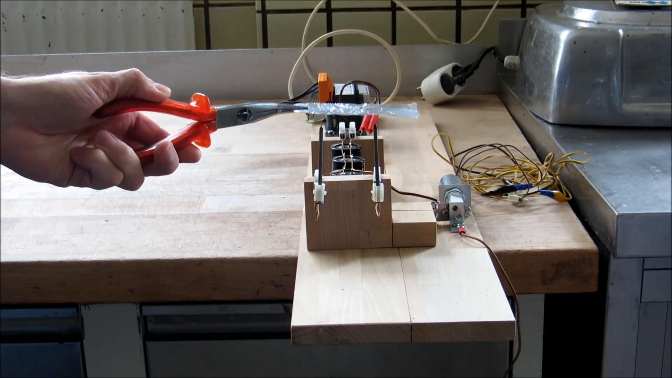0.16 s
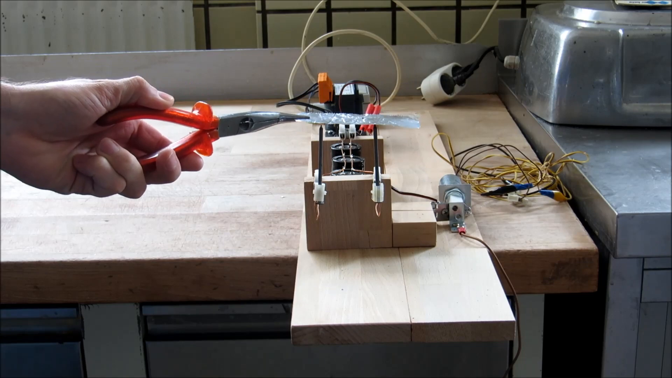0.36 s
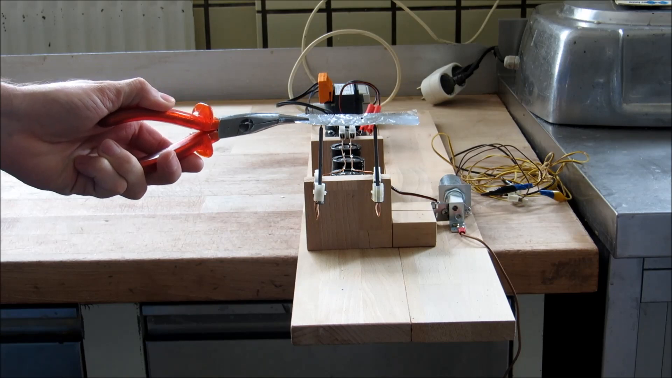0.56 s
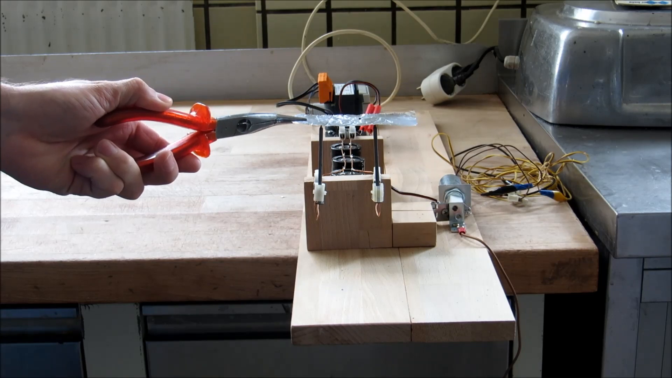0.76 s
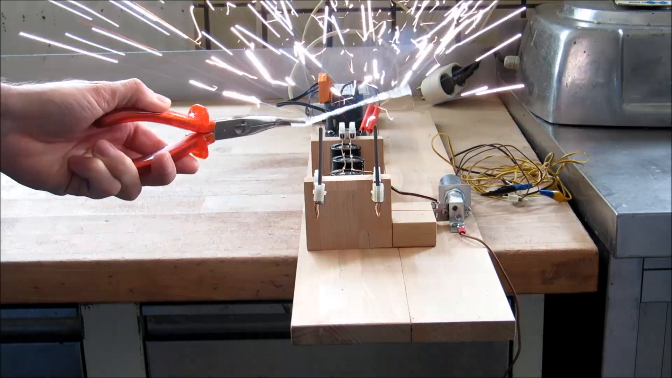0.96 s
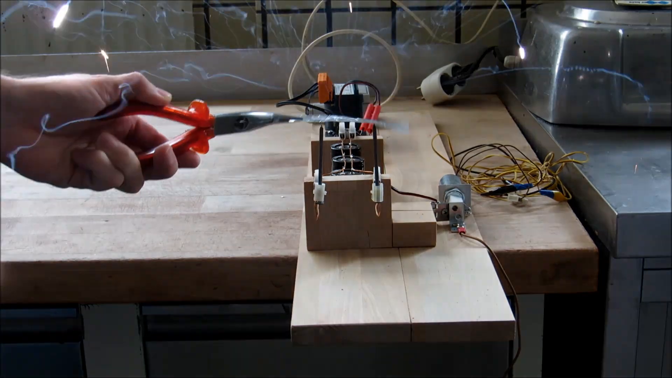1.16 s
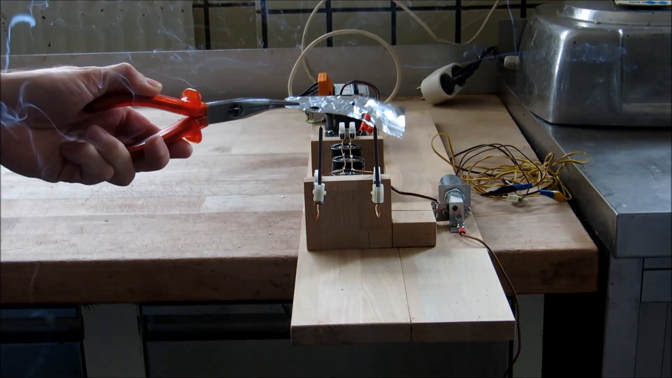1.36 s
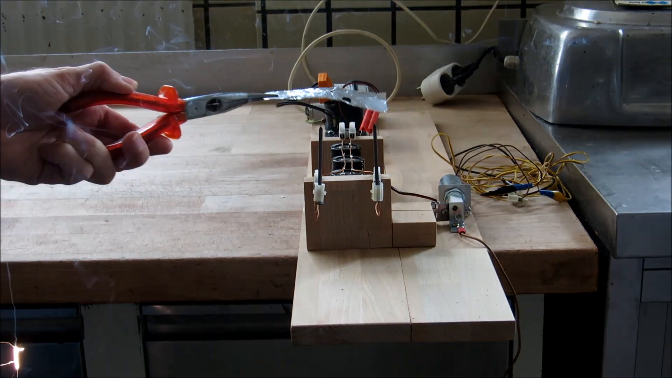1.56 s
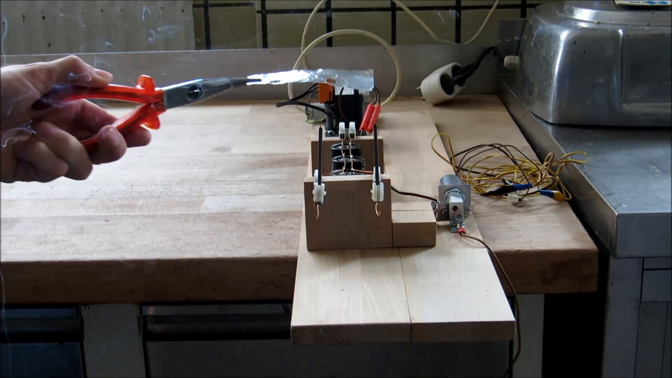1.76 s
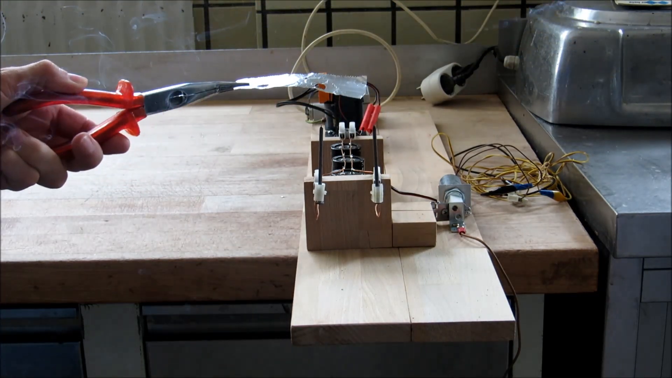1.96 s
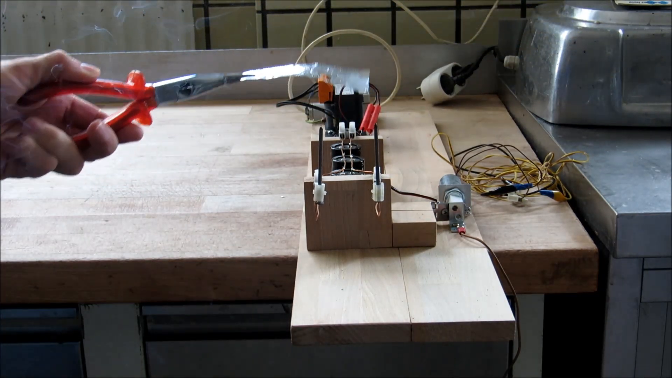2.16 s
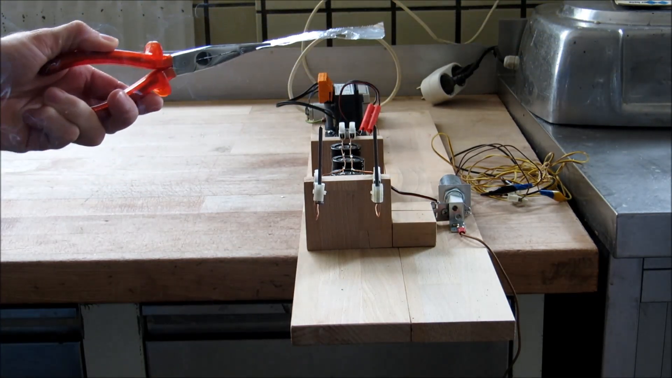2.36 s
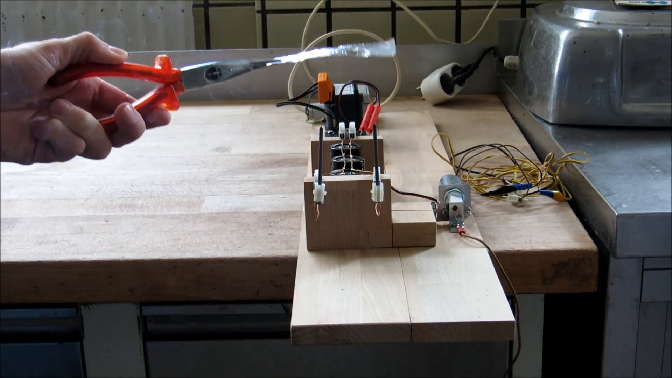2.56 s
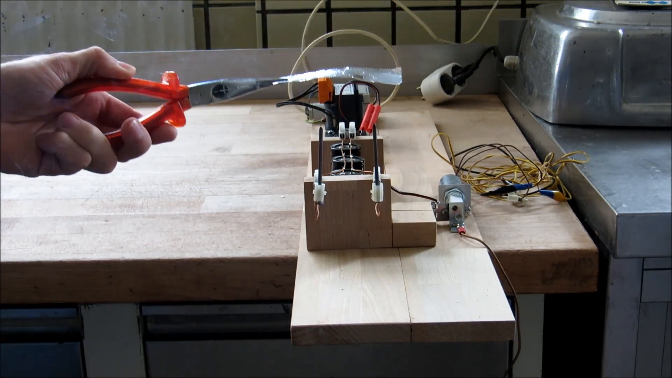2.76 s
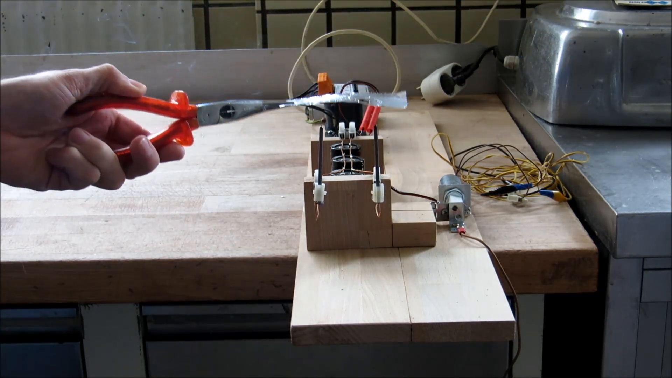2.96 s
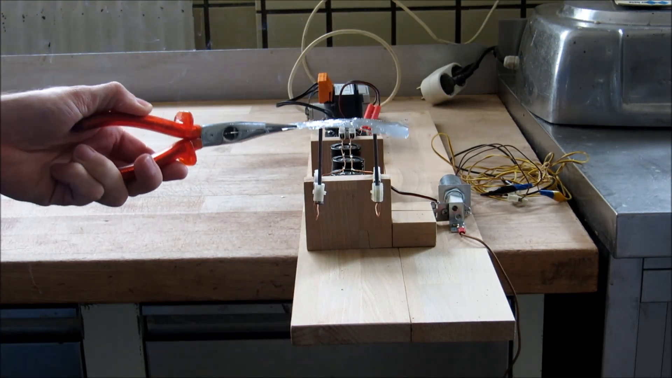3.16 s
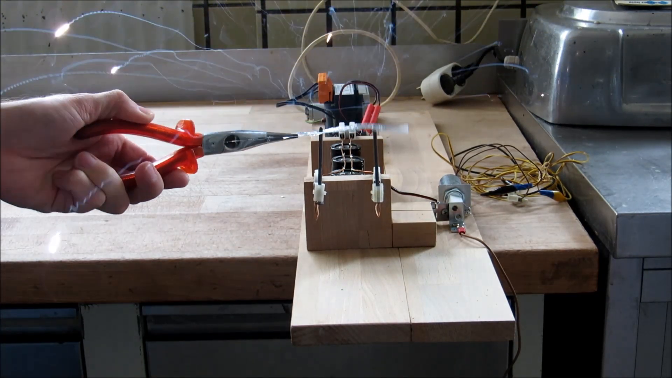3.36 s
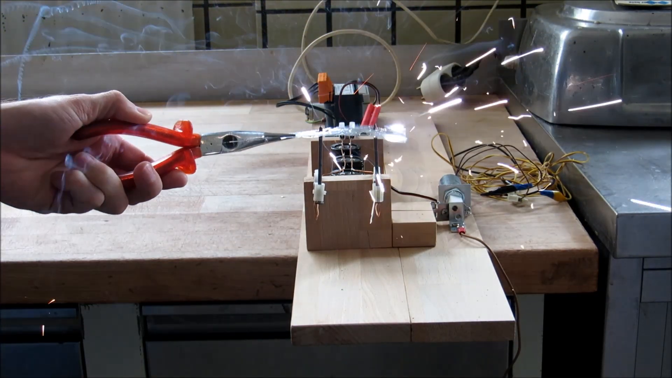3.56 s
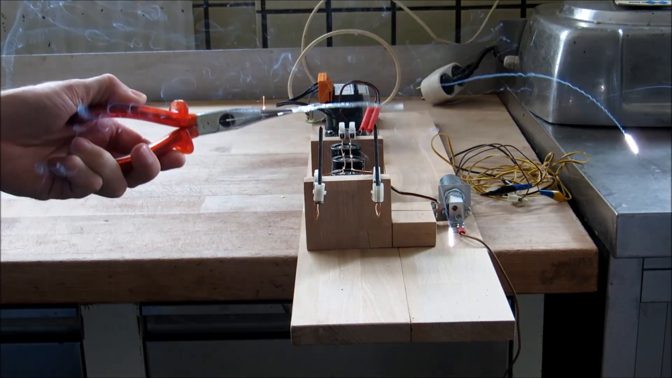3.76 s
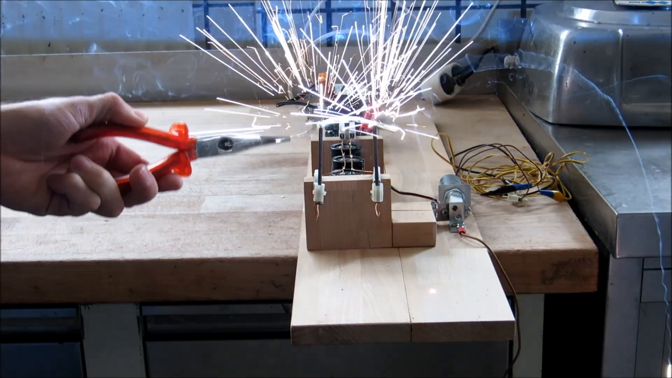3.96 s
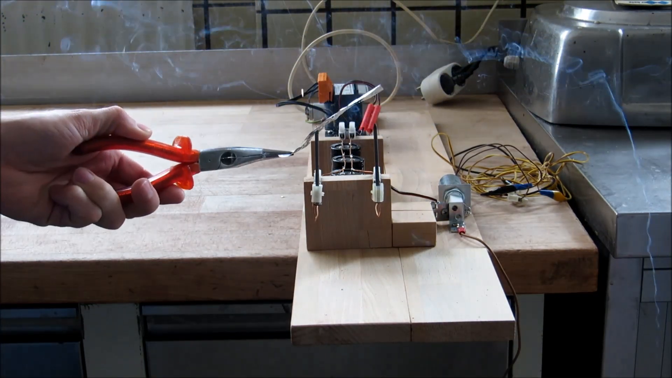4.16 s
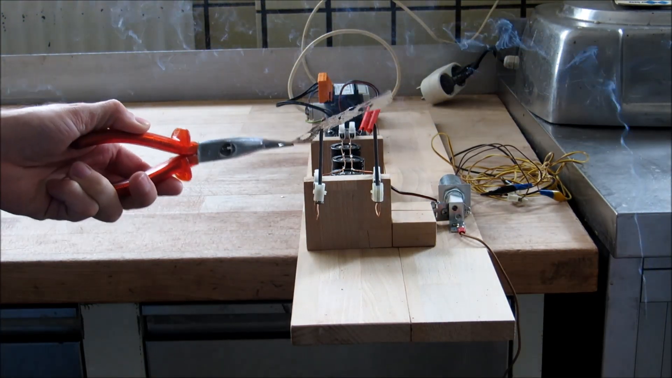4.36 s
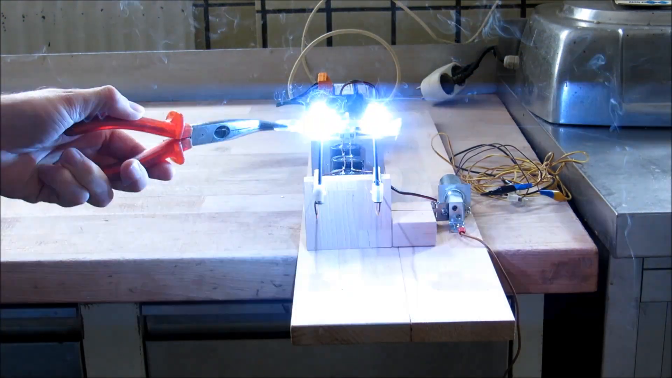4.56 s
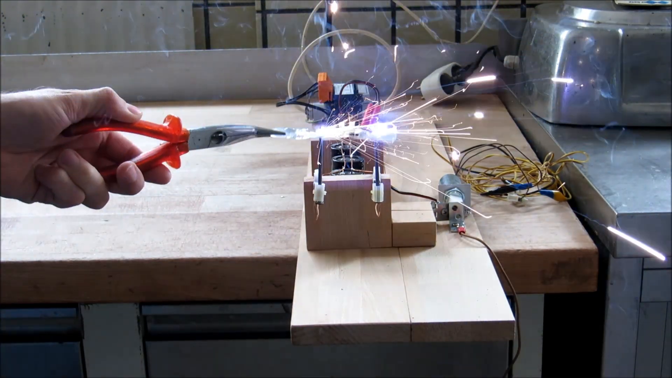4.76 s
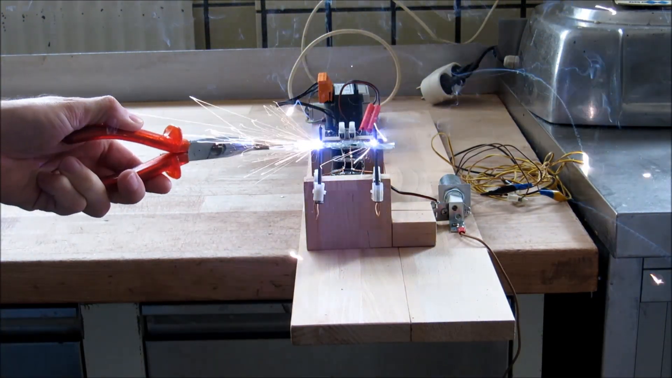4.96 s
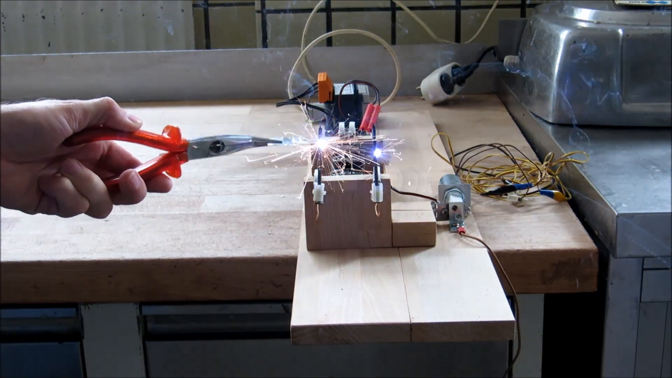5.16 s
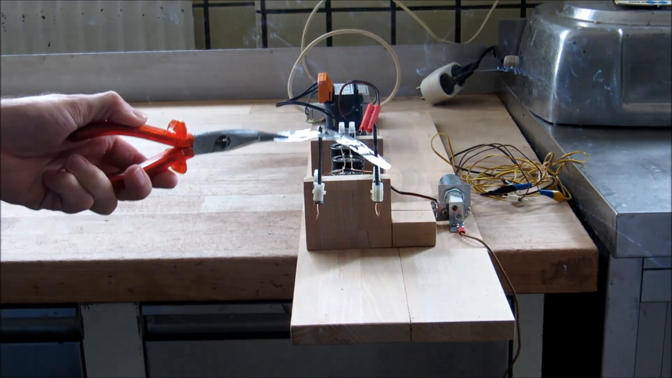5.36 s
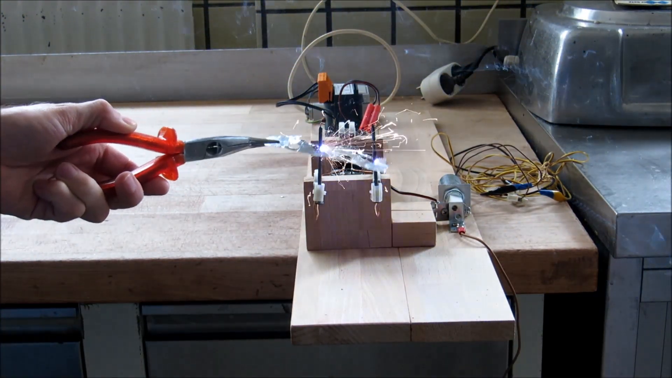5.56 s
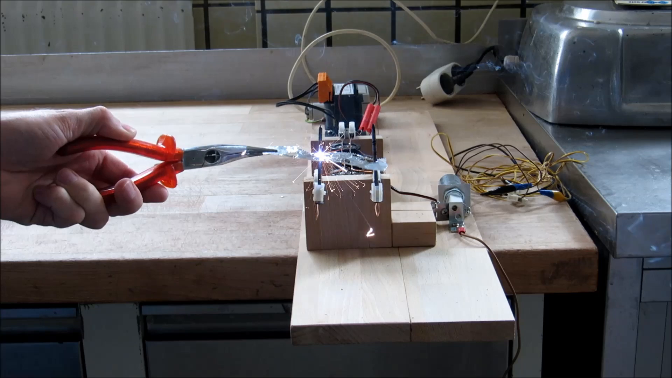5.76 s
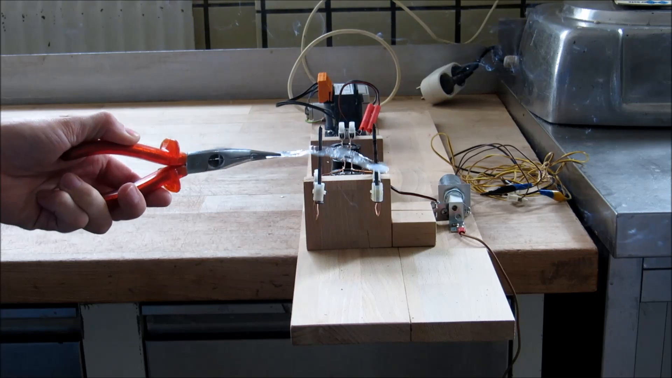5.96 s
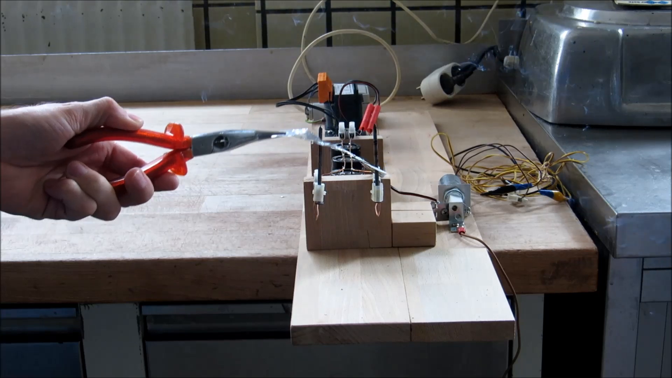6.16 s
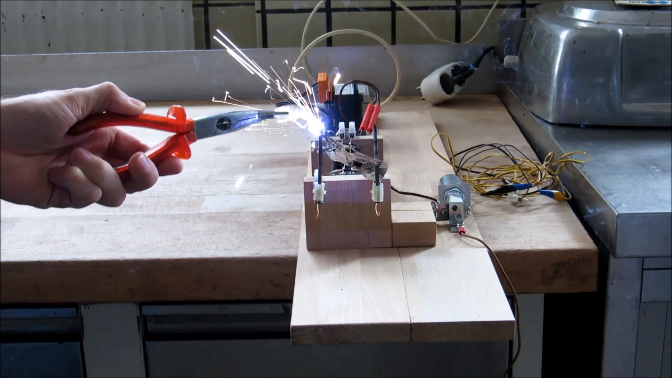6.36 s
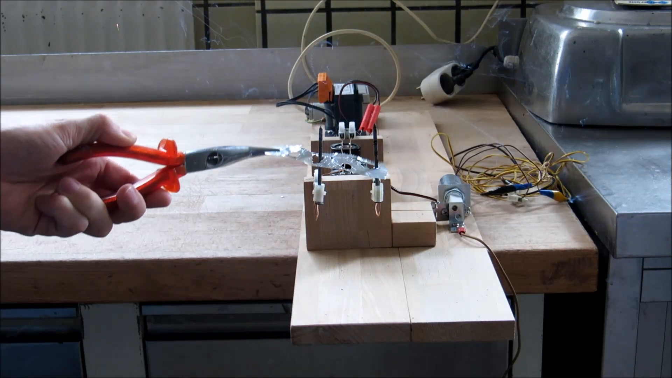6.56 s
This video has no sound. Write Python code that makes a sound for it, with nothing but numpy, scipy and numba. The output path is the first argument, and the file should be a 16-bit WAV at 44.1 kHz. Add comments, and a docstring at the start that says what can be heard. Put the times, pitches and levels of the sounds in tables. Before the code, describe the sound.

For the first second there is only quiet, wide amplifier hiss, a very thin high whine and a barely noticeable low rumble. At 1.03 a huge, instantaneous electric crack clips the microphone, slaps off bench and tiles and rings through the hard room for almost a second. The gain ducks; hiss slowly returns, with faint foil ticks around 1.3 to 1.55. At 3.31 another massive crack, then a strong one at 3.66 with a lesser one right behind at 3.72, and a sharp one at 4.06. Faint thin crinkle runs from 4.5 to 4.8. Smaller bangs come at 4.70 and in a tight cluster at 4.80 to 4.86. From 4.99 rapid snaps and frying arc sputter come in broken spells, thinning near 5.5, thickening at 5.63 to 5.96, then sparse. At 6.38 a last flurry of snaps and a harsh fizz fades by 6.6.

```python
"""Capacitor bank sparking through foil

A charged capacitor bank shorts through a strip of foil on a bench in a hard-walled room. Each spark is
a tiny shock wave, a push and a rebound; filtered random taps and discrete echoes throw it back.
Arcs and crinkle are dense random small shocks; low rumble, shaped hiss and thin whines lie beneath.
The camera's gain control dives at each bang and lets its own hiss creep back up."""
import sys
import numpy as np
from scipy import signal
from scipy.fft import rfft, irfft
from scipy.io import wavfile
from numba import njit

SR = 44100
rng = np.random.default_rng(int(sys.argv[2]) if len(sys.argv) > 2 else 0)


def file_out(sig):
    """Save sig as 16-bit WAV at sys.argv[1]."""
    # one column per channel
    cols = np.atleast_2d(sig).T
    # limit, then scale
    lim = np.clip(cols, -1, 1)
    pcm = np.round(lim * 32767).astype(np.int16)
    wavfile.write(sys.argv[1], SR, pcm)


def makeup_ratio(level_db):
    """Linear amplitude ratio for a level in decibels (20 dB per factor of ten)."""
    decades = np.asarray(level_db, float) / 20
    return 10 ** decades


N = 291456

# Bangs, where the foil blows apart. Each row: start in seconds, strength in dB before room and gain control,
# rebound time in ms, puff of hot gas in dB.
BANG_EVENTS = [(1.0327, 39, 0.044, 17), (3.3125, 36.5, 0.044, -6), (3.662, 34.5, 0.033, 8),
               (3.7217, 26, 0.032, 5.5), (4.0567, 25, 0.059, -18), (4.7018, 21, .07, -26),
               (4.8041, 25, 0.044, -2.5), (4.834, 24, 0.018, -26), (4.8599, 19.5, .04, -24),
               (4.9891, 20, .07, -31), (6.3818, 19, 0.01, -34), (6.392, 20.5, 0.013, -34)]
# The loudest snaps of the arc. Each row: start in seconds, strength in dB before room and gain control.
SNAP_EVENTS = [(4.9979, 20.5), (5.0047, 20), (5.0129, 17.5), (5.0181, 22), (5.0211, 16.5), (5.0247, 23),
               (5.032, 19), (5.0731, 16), (5.077, 14.5), (5.1035, 12.5), (5.108, 18), (5.1343, 14),
               (5.1581, 16.5), (5.1876, 0), (5.1988, 11), (5.2635, 7.5), (5.2665, 16.5), (5.2842, 15.5),
               (5.3008, 12), (5.331, 6.5), (5.339, 17.5), (5.3449, 8), (5.358, 11), (5.3628, 11.5),
               (5.4083, 12), (5.4463, 6), (5.503, 7), (5.5036, 8.5), (5.5061, 6), (5.6261, 5.5),
               (5.6321, 11.5), (5.6434, 14.5), (5.6639, 7), (5.681, 11), (5.687, 14.5), (5.6955, 9),
               (5.7124, 9), (5.7178, 16), (5.7295, 11.5), (5.7361, 12), (5.7572, 11), (5.7594, 5),
               (5.7673, 13), (5.7715, 16.5), (5.7785, 7), (5.8166, 19), (5.8275, 15), (5.841, 10),
               (5.86, 8), (5.8757, 14.5), (5.9144, 8), (5.9454, 6.5), (5.9526, 12), (6.0122, 5),
               (6.0211, -2.5), (6.1918, -7), (6.197, 1.5), (6.3726, 0), (6.3737, 6.5), (6.3801, 12.5),
               (6.3817, 15), (6.3839, 15.5), (6.3923, 21), (6.3937, 26.5), (6.4, 16), (6.408, 21.5)]
# Spells of sputtering arc. Each row: start in seconds, length in seconds, first level in dB, last level in dB,
# both before the bass is thinned and before room and gain control.
ARC_SPELLS = [(4.995, 0.025, -12, -6), (5.06, .155, -23, -20.5), (5.262, 0.043, -16, -10),
              (5.33, 0.03, -18, -8.5), (5.395, 0.077, -21, -35), (5.5, .018, -20, -33.5),
              (5.626, .06, -30, -7.5), (5.686, 0.09, -7.5, -7), (5.82, .14, -10.5, -15),
              (6.01, 0.068, -17, -34), (6.19, 0.012, -33, -24.5), (6.373, 0.013, -22.5, -13),
              (6.415, 0.19, -3, -33)]
# Spells of faint treble crinkle, foil and hot crumbs. Each row: start in seconds, length in seconds,
# first level in dB, last level in dB, both before room and gain control.
CRINKLE_SPELLS = [(1.33, 0.054, -45, -56), (1.545, 0.018, -55, -49), (4.37, 0.02, -51, -56),
                  (4.51, 0.3, -46.5, -46)]
# Resonances of the camera shell. Each row: centre in Hz, level in dB against the direct sound,
# time to fall 60 dB in seconds.
SHELL_MODES = [(923, -24.5, 0.0082), (2900, -27.5, 0.0022), (4800, -24.5, 0.0012), (5500, -32, .002),
               (7890, -23, .0035), (12200, -21, 0.0014)]
# Bench, tiles and walls; dull bent paths turn over. Each row: delay in ms, signed gain, left-right tilt in dB.
WALL_ECHOES = [(.57, -.29, .5), (.946, .12, 3), (4.48, .12, -.5), (5.756, -.25, -8), (6.348, .42, 3.5),
               (8.14, .38, 5), (8.965, .3, -1), (11.28, .34, 0), (12.035, .19, -4), (13.94, .12, 3),
               (15.45, .17, 10.5), (21.9, -.2, -4.5), (25.13, .083, -5)]
# How long the near room rings. Each row: frequency in Hz, time to fall 60 dB in seconds.
ROOM_DECAY = [(60, 0.1), (150, 1), (400, 0.77), (1000, 0.8), (2700, 0.83), (5500, 0.67), (8000, 0.5),
              (15000, 0.32)]
# Colour of the room tail. Each row: frequency in Hz, relative level in dB.
ROOM_COLOUR = [(60, -6.5), (160, -2.5), (220, 3), (430, 4), (490, 2), (640, 9.5), (1100, 7), (2000, 4),
               (5000, 0), (8500, 0.5), (12000, -5), (16000, -8.5)]
# Left-right likeness of the room tail. Each row: frequency in Hz, likeness from 0 to 1.
ROOM_LIKENESS = [(60, 0.75), (240, 0.87), (950, 0.9), (3770, 0.87), (15000, 0.48)]
# Swells of distant low rumble. Each row: start in seconds, length in seconds, first level in dB,
# last level in dB, both before gain control.
RUMBLE_SWELLS = [(0, 0.28, -73, -68), (.55, .3, -72, -70), (2.25, 0.18, -70, -75), (2.9, .3, -76, -72)]
# Colour of the hiss shared by both microphones. Each row: frequency in Hz, relative density in dB per Hz.
HISS_MID_COLOUR = [(15, -37.5), (25, -11), (113, -8.5), (233, -2), (445, -5.5), (762, -1.5), (1410, -3.5),
                   (1570, -4.5), (14300, -17.5), (15500, -17.5)]
# Colour of the left-right difference hiss. Each row: frequency in Hz, relative density in dB per Hz.
HISS_SIDE_COLOUR = [(15, -38.5), (25, -5), (48, 7.5), (108, -8), (223, 0), (545, -1.5), (911, 1.5),
                    (7510, -17), (12200, -24), (16000, -24.5)]
# Whines of the electronics. Each row: frequency in Hz, rms level in dB before gain control.
WHINE_TONES = [(7865, -86), (15735, -72)]


def read(points, hz):
    """Value of a spectrum table at hz, interpolated over log frequency."""
    f, value = np.transpose(points)
    return np.interp(np.log(hz + 1), np.log(f + 1), value)


def evened(x):
    """Scaled to rms 1."""
    return x / np.sqrt(np.mean(x ** 2))


def level(spells, rise_db_per_s=20000, fade_db_per_s=900):
    """Gain over time: each spell sets in, slides from its first level to its last, and dies."""
    t, out = np.arange(N) / SR, np.zeros(N)
    for start, length, first_db, last_db in spells:
        before_db = rise_db_per_s * np.maximum(start - t, 0)
        after_db = fade_db_per_s * np.maximum(t - start - length, 0)
        slide_db = np.interp(t, [start, start + length], [first_db, last_db])
        out = np.maximum(out, makeup_ratio(slide_db - before_db - after_db))
    return out


def shock(push_ms, rebound_ms, late=0.):
    """A sharp push, then a rebound of equal area; the microphone turns it over. late is in samples."""
    ms = np.maximum(np.arange(160) - late, 0) / SR * 1000
    push = np.sin(np.pi * np.minimum(ms / push_ms, 1))
    after = np.maximum(ms - push_ms, 0) / rebound_ms
    rebound = after * np.exp(-after)
    return rebound * push.sum() / rebound.sum() - push


def sparks(shortest_push_ms=0.052, swelling=0.45, snap_rebound_ms=0.021, puff_ms=0.21):
    """A slow rebound goes with a long push; a bang also throws a low puff of hot gas."""
    out = np.zeros(N + SR)
    bangs = [row[:3] for row in BANG_EVENTS]
    snaps = [(*row, snap_rebound_ms) for row in SNAP_EVENTS]
    for start, db, rebound_ms in bangs + snaps:
        at = int(start * SR)
        push_ms = shortest_push_ms + swelling * rebound_ms
        crack = shock(push_ms, rebound_ms, late=start * SR - at)
        out[at:at + len(crack)] += makeup_ratio(db) * crack
    puff = shock(puff_ms, puff_ms)
    for start, _, _, puff_db in BANG_EVENTS:
        at = int(start * SR)
        out[at:at + len(puff)] += makeup_ratio(puff_db) * puff
    return out[:N]


def crackle(per_s, spread_db, push_ms):
    """Small shocks at random moments, more small ones than large, rms 1."""
    size = makeup_ratio(spread_db * np.minimum(rng.exponential(1, N), 3))
    struck = rng.random(N) < per_s / SR
    return evened(np.convolve(size * struck, shock(push_ms, push_ms * 0.48))[:N])


def arcs(spits_db=4, thin_hz=900):
    """The arc restrikes about a thousand times a second, with sparser, larger spits on top; little bass."""
    fine = crackle(per_s=1100, spread_db=3.5, push_ms=0.061)
    spits = crackle(per_s=220, spread_db=4, push_ms=0.045)
    sputter = level(ARC_SPELLS) * evened(fine + makeup_ratio(spits_db) * spits)
    return signal.lfilter(*signal.butter(1, thin_hz, "high", fs=SR), sputter)


def crinkle():
    """Dense, thin ticks, small shocks stripped of their body by a high-pass."""
    ticks = crackle(per_s=1500, spread_db=4, push_ms=0.05)
    thin = signal.sosfilt(signal.butter(2, 6500, "high", fs=SR, output="sos"), ticks)
    return level(CRINKLE_SPELLS) * evened(thin)


def shell(detune=0.031, lean=0.096, lean_hz=700):
    """The camera body rings briefly, a little differently at each microphone; bass leans right."""
    t, out = np.arange(600) / SR, np.zeros((2, 600))
    for k, (hz, db, t60) in enumerate(SHELL_MODES):
        # the two microphones hear each mode detuned opposite ways, alternating from mode to mode
        pair_hz = hz * (1 + (-1) ** k * detune * np.array([[1], [-1]]))
        out += makeup_ratio(db - 60 * t / t60) * np.sin(2 * np.pi * pair_hz * t)
    out[:, 0] += 1  # direct sound
    bass = signal.lfilter(*signal.butter(1, lean_hz, fs=SR), out)
    return out + lean * np.array([[-1], [1]]) * bass


def echoes(wall_hz=10000, clutter_db=-31, clutter_t60=0.026, wide=0.13):
    """Direct path, scatter off the things on the bench and dulled wall echoes, all ringing the shell."""
    t = np.arange(2000) / SR
    shared, own = rng.standard_normal((2, 2000))
    scatter = np.array([shared + wide * own, shared - wide * own])
    late = makeup_ratio(clutter_db - 60 * t / clutter_t60) * scatter
    late[:, :10] = 0  # the nearest object adds 8 cm of path
    for ms, gain, pan_db in WALL_ECHOES:
        late[:, round(ms * SR / 1000)] += gain * makeup_ratio(np.array([0.5, -0.5]) * pan_db)
    paths = signal.lfilter(*signal.butter(1, wall_hz, fs=SR), late)
    paths[:, 0] += 1  # direct sound stays bright
    return signal.fftconvolve(paths, shell(), axes=1)


def room(tail_db=-3, rise_ms=8, far_db=-16, slower=1.46):
    """The echoes, then a sparse diffuse tail dying band by band; the far end of the room dies slower."""
    size = 3 * SR // 2
    # one random tap somewhere in every ten samples
    at = np.arange(0, size - 10, 10)
    taps = np.zeros((2, size))
    taps[:, at + rng.integers(0, 10, len(at))] = rng.standard_normal((2, len(at)))
    hz, t, z = signal.stft(taps, SR, nperseg=512)
    same = np.clip(read(ROOM_LIKENESS, hz), -1, 1)[:, None]
    z[1] = same * z[0] + np.sqrt(1 - same ** 2) * z[1]
    fall_db = -60 * t / read(ROOM_DECAY, hz)[:, None]
    near, far = makeup_ratio(fall_db), makeup_ratio(far_db + fall_db / slower)
    z *= makeup_ratio(read(ROOM_COLOUR, hz))[:, None] * np.hypot(near, far)
    tail = signal.istft(z, SR, nperseg=512)[1][:, :size]
    tail *= 1 - np.exp(-np.arange(size) / SR * 1000 / rise_ms)
    tail *= makeup_ratio(tail_db) / np.linalg.norm(tail[0])
    early = echoes()
    tail[:, :early.shape[1]] += early
    return tail


def rumble(low_hz=45, high_hz=75):
    """A narrow band of low noise that comes and goes, alike at both microphones."""
    band_filter = signal.butter(2, [low_hz, high_hz], "band", fs=SR, output="sos")
    band = signal.sosfilt(band_filter, rng.standard_normal(N))
    return level(RUMBLE_SWELLS, rise_db_per_s=60, fade_db_per_s=57.5) * evened(band)


def hiss(mid_db=-56.5, side_db=-46):
    """Steady amplifier noise, strongest as a left-right difference, plus thin whines."""
    hz = np.fft.rfftfreq(N, 1 / SR)
    white = rfft(rng.standard_normal((2, N)))
    mid = makeup_ratio(mid_db) * evened(irfft(white[0] * makeup_ratio(read(HISS_MID_COLOUR, hz)), N))
    side = makeup_ratio(side_db) * evened(irfft(white[1] * makeup_ratio(read(HISS_SIDE_COLOUR, hz)), N))
    for f, db in WHINE_TONES:
        mid += makeup_ratio(db) * np.sqrt(2) * np.sin(2 * np.pi * f * np.arange(N) / SR)
    return np.array([mid + side, mid - side])


def scene(mic_low_hz=130):
    """Sparks through the room and the small microphones' bass loss, over rumble and hiss."""
    dry_sparks = sparks() + arcs() + crinkle()
    source = signal.lfilter(*signal.butter(1, mic_low_hz, "high", fs=SR), dry_sparks)
    in_room = signal.fftconvolve(source[None], room(), axes=1)[:, :N]
    return in_room + rumble() + hiss()


@njit
def gain_control(x, knee, dive_db, keep):
    """Output over the knee piles up a cut in dB that drains away slowly; what is still too loud clips."""
    out, cut_db = np.empty_like(x), 0.
    for i in range(x.shape[1]):
        gain = 10 ** (-cut_db / 20)
        out[0, i] = min(max(x[0, i] * gain, -1.), 1.)
        out[1, i] = min(max(x[1, i] * gain, -1.), 1.)
        peak = max(abs(out[0, i]), abs(out[1, i]))
        cut_db = cut_db * keep + dive_db * max(peak - knee, 0.)
    return out


def roll_off(x):
    """The treble ends steeply here."""
    return signal.sosfilt(signal.butter(12, 16400, fs=SR, output="sos"), x)


def record(dry):
    """Gain control with clipping, recovering over 0.9 s, then a steep treble limit."""
    held = gain_control(dry, knee=0.2, dive_db=0.44, keep=np.exp(-1 / (0.9 * SR)))
    edge = signal.firwin(255, 15950, window=("kaiser", 7), fs=SR)
    mix = signal.oaconvolve(held, edge[None], "same")
    return roll_off(mix)


dry = scene()
out = record(dry)
file_out(out)
```